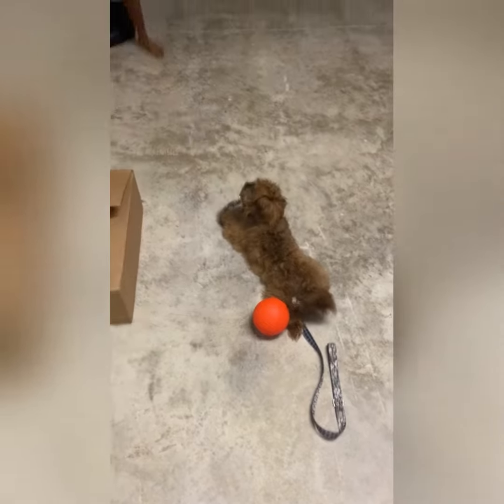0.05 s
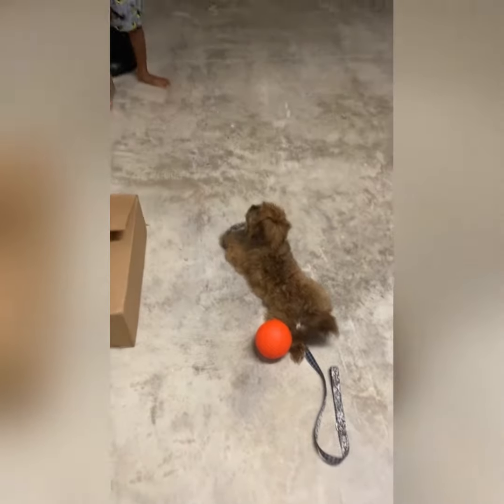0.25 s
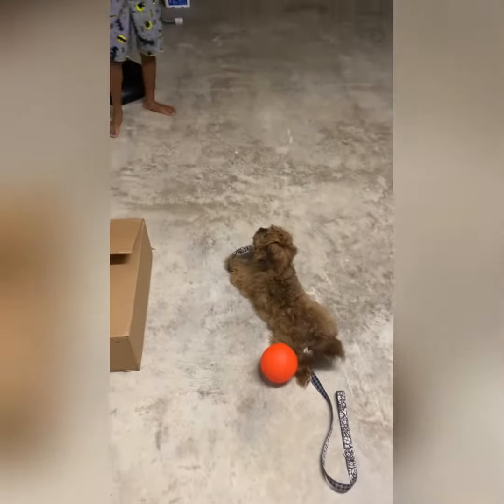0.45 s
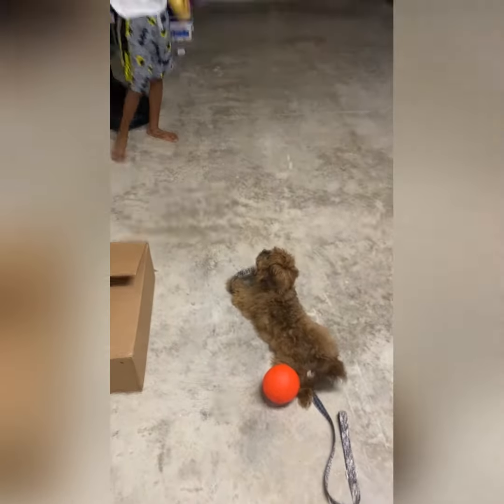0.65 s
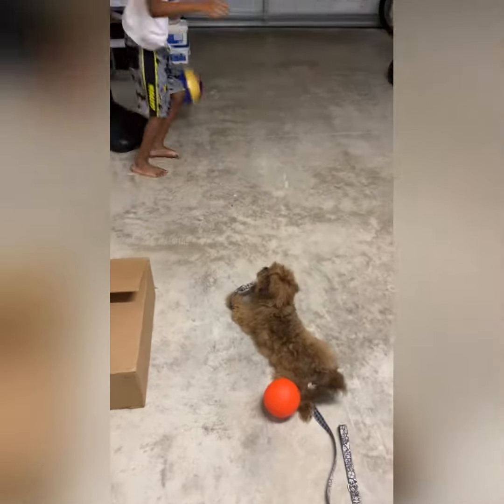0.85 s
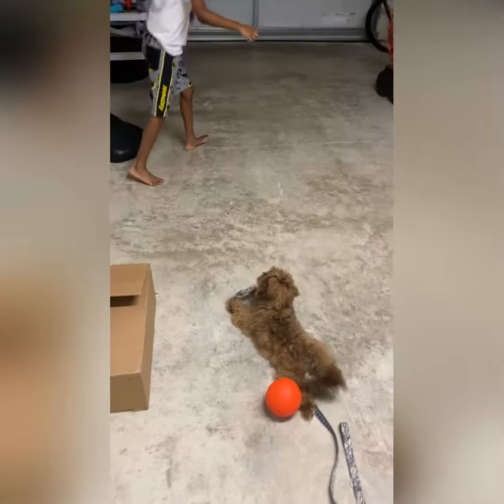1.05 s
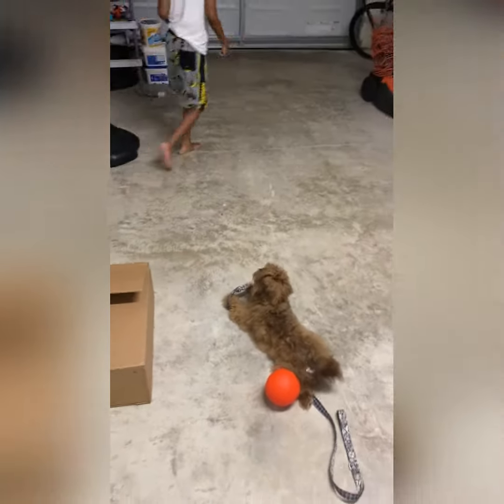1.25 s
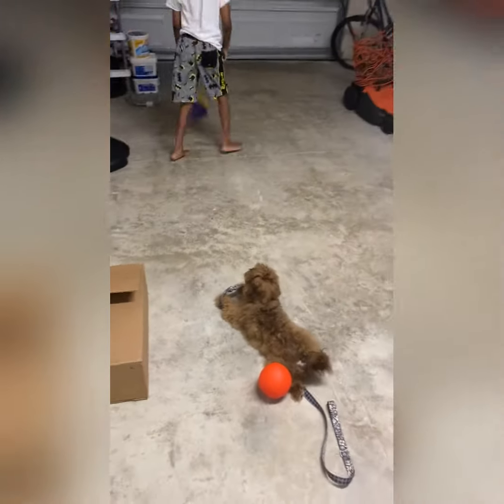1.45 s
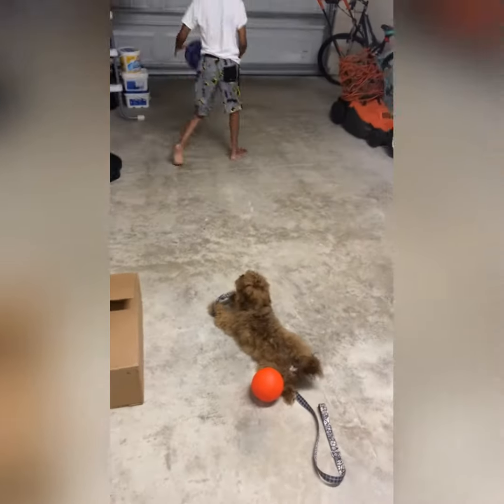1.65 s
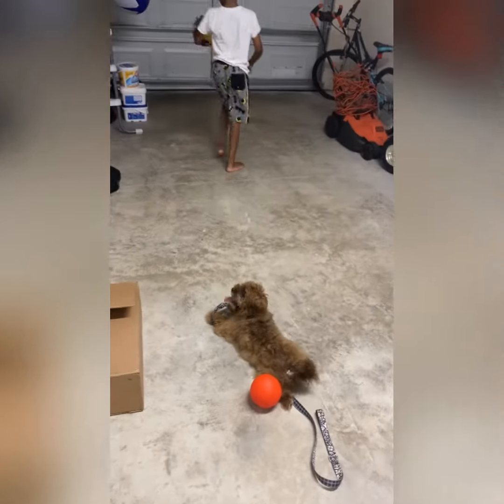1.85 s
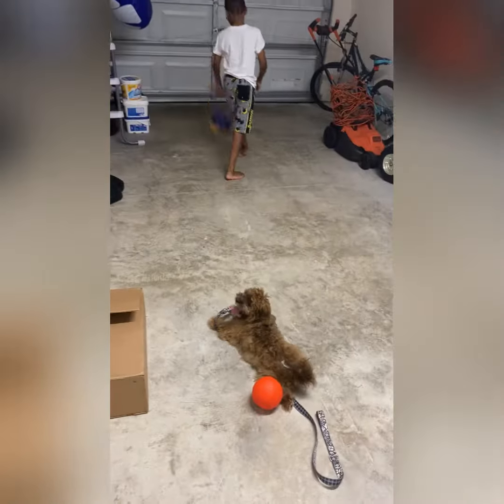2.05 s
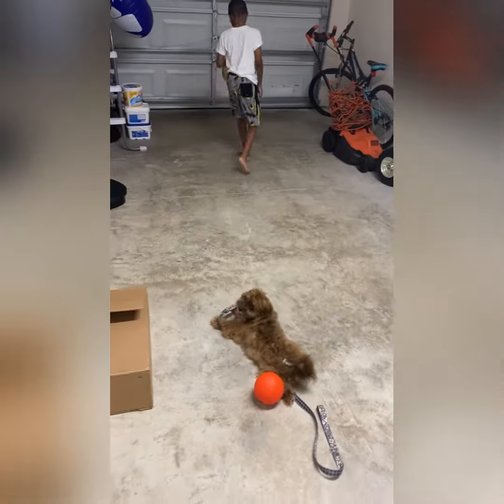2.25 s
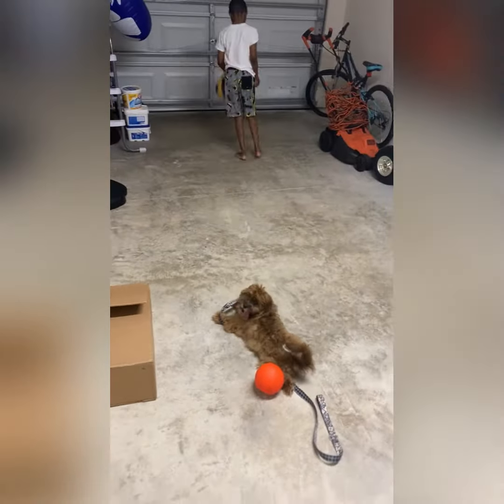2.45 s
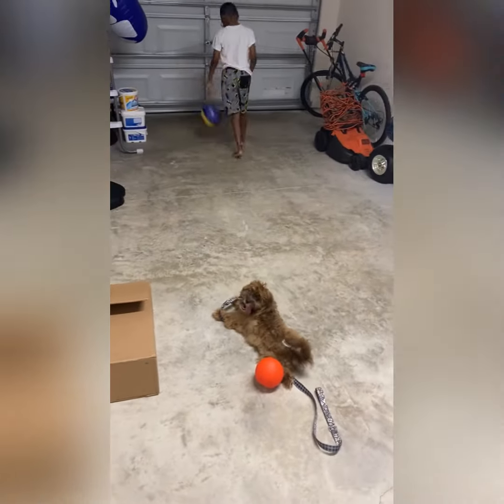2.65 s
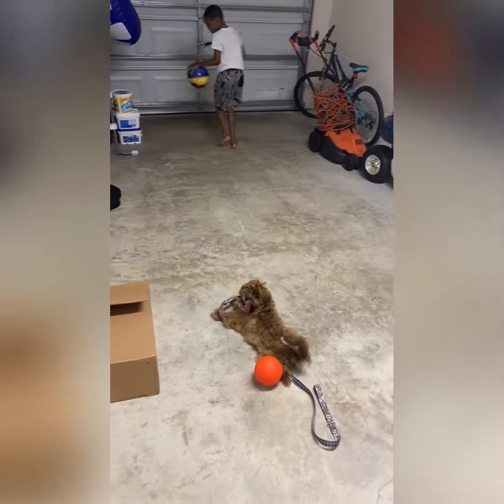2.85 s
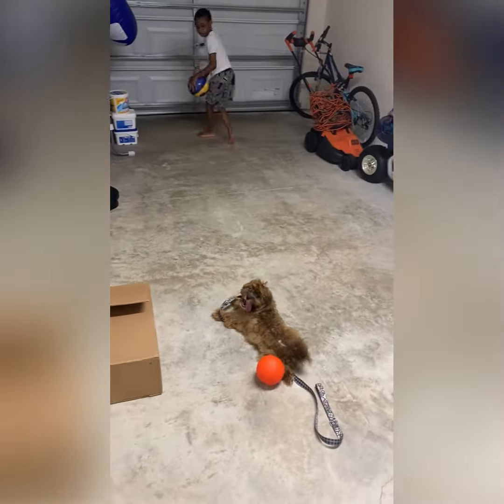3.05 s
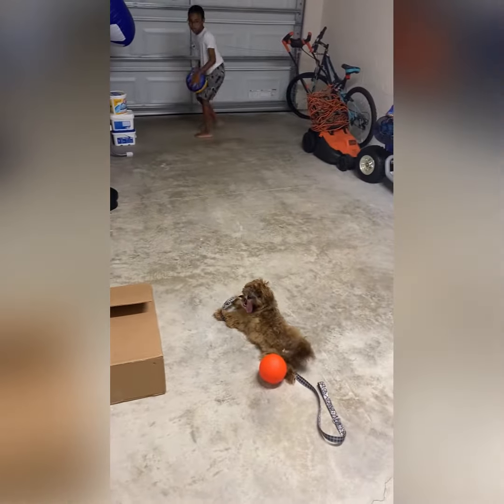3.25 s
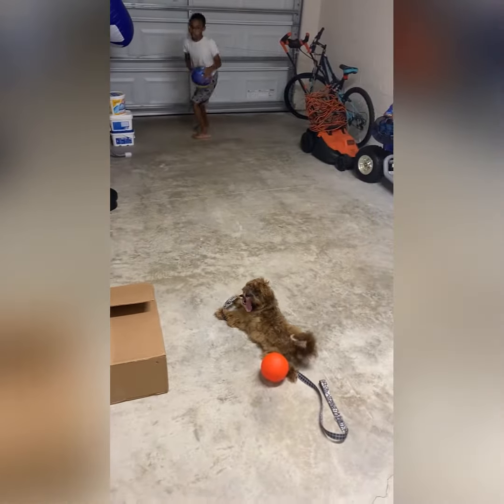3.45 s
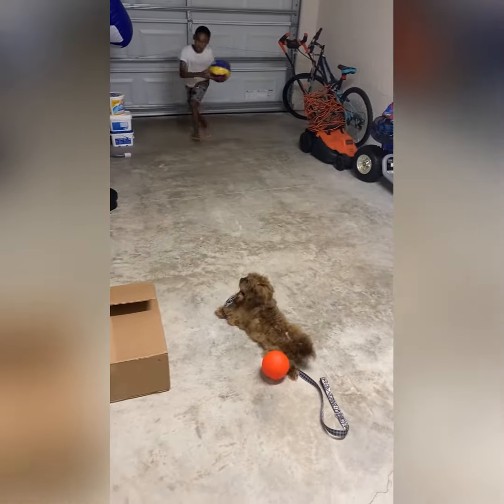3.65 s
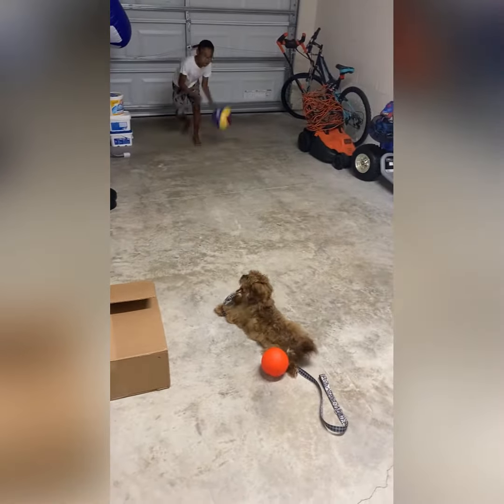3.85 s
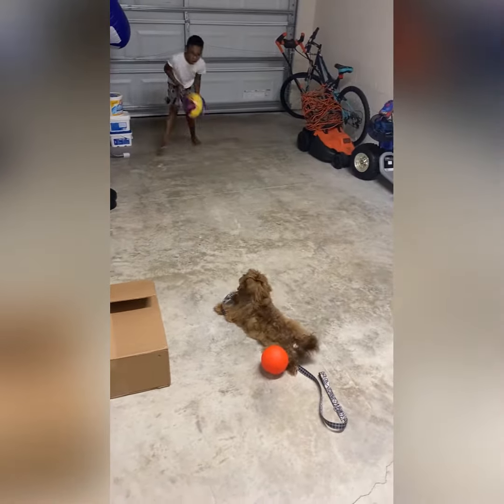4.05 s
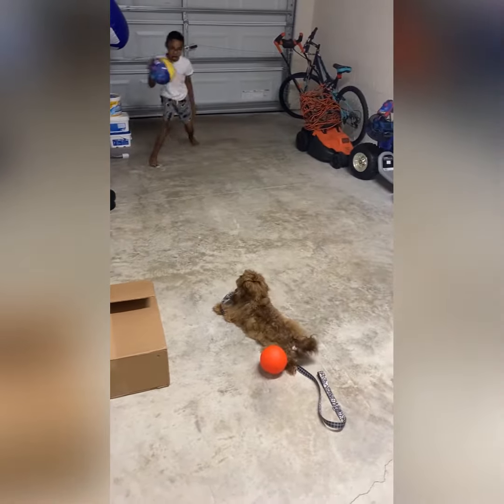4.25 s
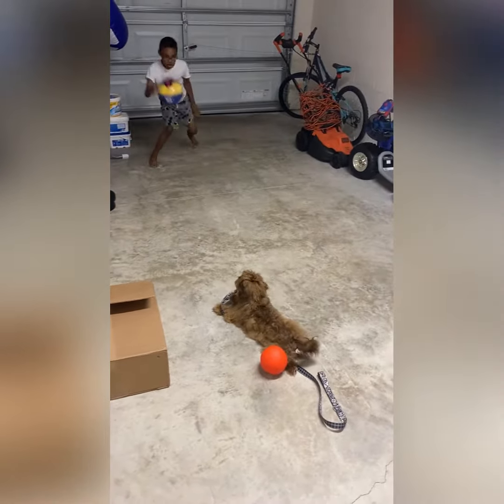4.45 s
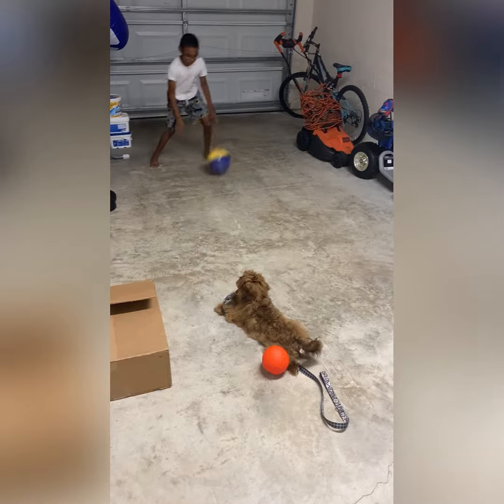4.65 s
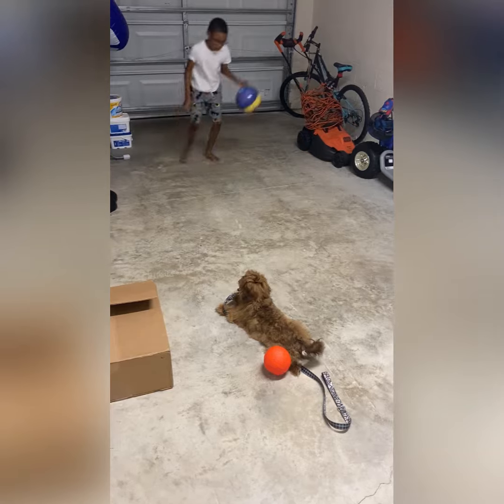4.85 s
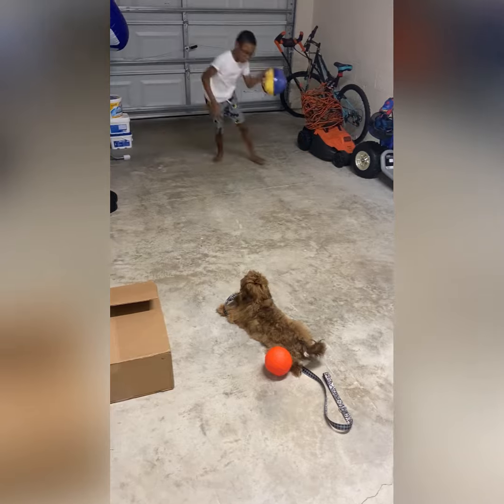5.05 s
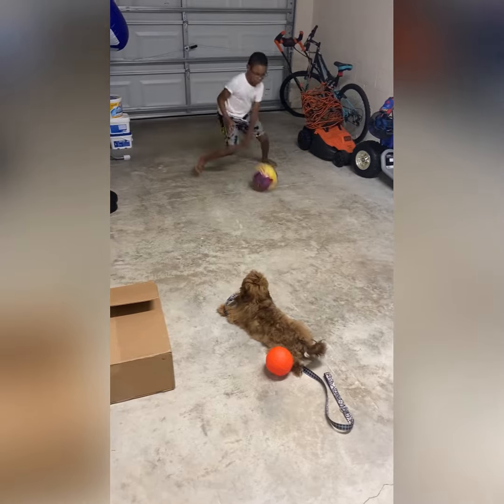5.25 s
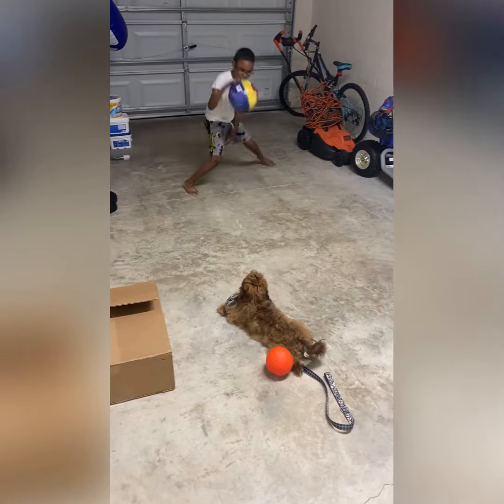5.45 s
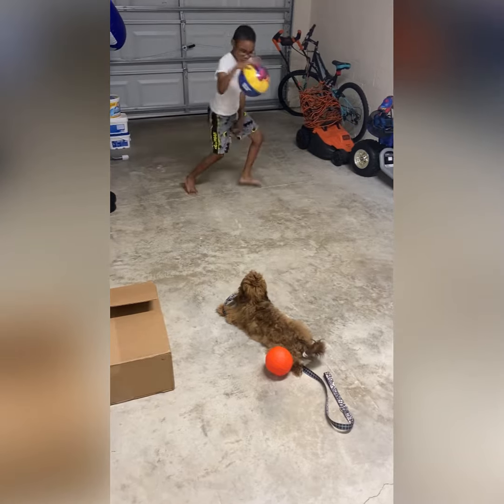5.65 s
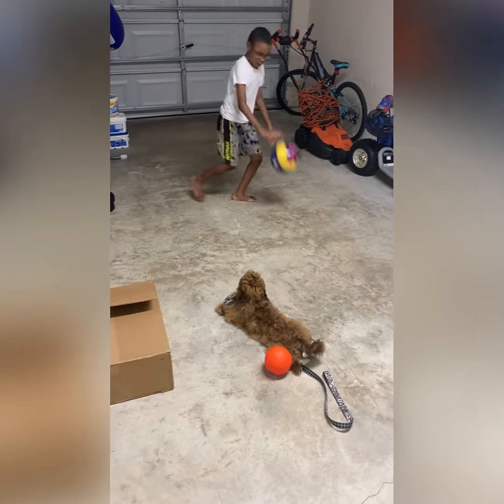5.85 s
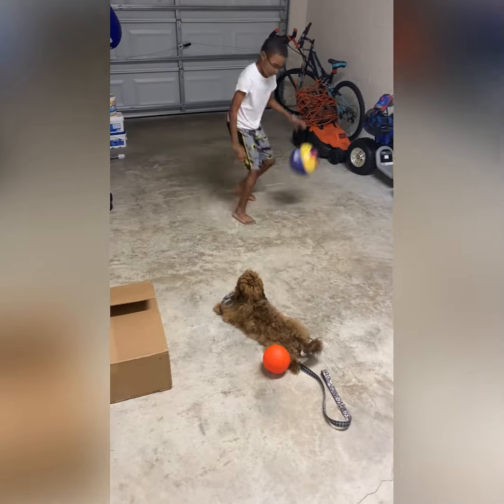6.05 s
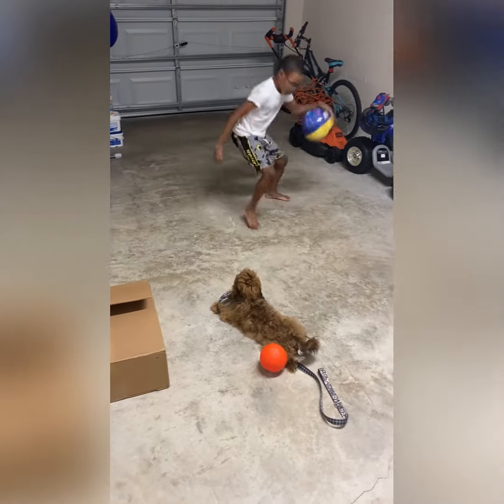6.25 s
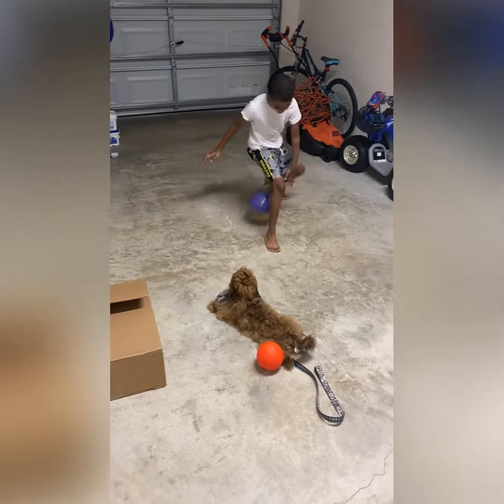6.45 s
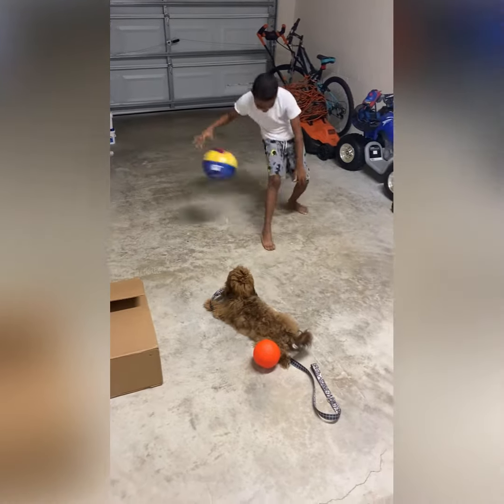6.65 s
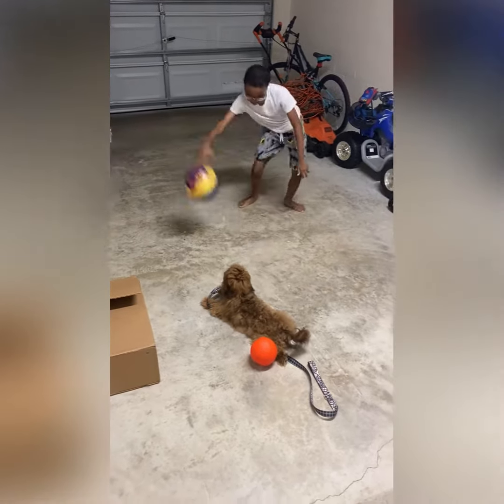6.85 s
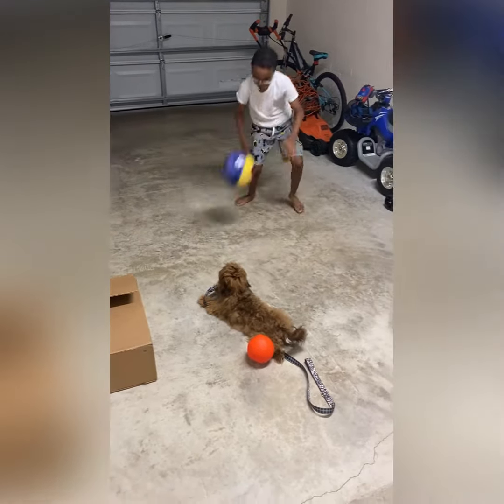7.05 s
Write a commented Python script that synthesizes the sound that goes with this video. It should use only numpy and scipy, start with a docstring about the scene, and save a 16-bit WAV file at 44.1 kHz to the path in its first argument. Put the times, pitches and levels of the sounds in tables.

```python
"""Dribbling a ball in a closed garage

A child dribbles an inflated ball on concrete, walks away towards the door, pauses to smack the held ball, comes back.
Each bounce mixes shaped noise bursts (slap), delayed pulses (thump, knock) and fading sine waves (ping, twang).
Harder bounces are brighter and nearer ones crisper; noise shaped to fade makes the bare room ring, and the door booms.
Pats, a smack, ticks and scuffs come in between, over a faint hiss and a low drone. A phone picks it all up."""
import sys
import numpy as np
from scipy import signal
from scipy.fft import rfft, irfft, next_fast_len
from scipy.io import wavfile
from scipy.ndimage import uniform_filter1d

SR = 44100
rng = np.random.default_rng(int(sys.argv[2]) if len(sys.argv) > 2 else 0)


def dump_mix(stems):
    """Bounce the given channels to the path in sys.argv[1] as a 16-bit WAV at rate SR."""
    frames = np.atleast_2d(stems).T  # one column per channel
    limited = np.clip(frames, -1, 1)  # hard clip at full scale
    pcm = np.round(limited * 32767).astype(np.int16)
    wavfile.write(sys.argv[1], SR, pcm)


N = 313191  # length of the scene in samples
T = np.arange(int(1.3 * SR)) / SR  # clock of one single sound, in seconds

USUAL_DB = 10  # strength of an ordinary bounce
SIZZLE_DB, BRIGHTENING = -6.5, 0.22  # over the slap at usual strength; dB gained per dB of strength above it
# The ball hits the floor. Each row: start in seconds, thump pitch in Hz, strength in dB, hollowness in dB.
BOUNCES = [(0.7857, 161, 11, 0), (1.4605, 182, 11.5, 1), (2.0659, 182, 13, 1), (2.5766, 150, 7, 0),
           (3.9058, 167.5, 11.5, -3.5), (4.631, 158, 10.2, -0.5), (5.236, 152.7, 14.5, -3),
           (5.9365, 142, 10.5, 2), (6.462, 163.7, 7, 4), (6.9233, 147.5, 10.5, -1)]


def bounces():
    """One strength drives every layer of a bounce; the treble grows faster than the rest."""
    out = np.zeros((2, N))
    for s, pitch, db, hollow_db in BOUNCES:
        direct_db = directness(s)
        bright_db = SIZZLE_DB + BRIGHTENING * (db - USUAL_DB)
        bounce = squash(pitch, hollow_db) + slap(direct_db) + amp(bright_db) * sizzle(direct_db)
        add(out, s, amp(db) * bounce)
    return out


# The skin meets the concrete. Each row: frequency in Hz, level in dB per Hz.
SLAP = [(100, -21), (400, -5.5), (650, -2.5), (900, 0.5), (1300, -2), (2100, -2), (3000, -6), (4500, -12),
        (9000, -44)]
# Air ringing inside the ball. Each row: frequency in Hz, strength in dB, time to fade by 60 dB in seconds.
CAVITY = [(877, 6, 0.066), (995, 4, 0.086), (1138, 0, 0.067), (1395, -3, 0.1), (2025, -16, 0.045),
          (3017, 5.5, 0.068), (4280, -10, 0.15), (4479, -5, 0.11)]
# The taut skin's brief twang, before its detuning. Each row: frequency in Hz, strength in dB,
# time to fade by 60 dB in seconds.
TWANG = [(1177, 2, 0.036), (1953, 2, 0.02), (2830, -6, 0.022)]
# Each spot of the skin twangs a little differently: spread of the pitch (natural log), of the strengths (dB).
TWANG_DETUNE, TWANG_SCATTER_DB = 0.07, 3.5


def slap(direct_db):
    """The skin meets the concrete and twangs; the air inside pings."""
    crack = contact(SLAP, life=0.00094, direct_db=direct_db - 1.5, build=0.0051)
    stretch = np.exp(TWANG_DETUNE * rng.normal())
    modes = [(stretch * hz, db, t60) for hz, db, t60 in TWANG]
    twang = amp(direct_db - 3.0) * ringing(modes, attack=0.00046, scatter_db=TWANG_SCATTER_DB)
    ping = garage(ringing(CAVITY, attack=0.0008, scatter_db=3.5))
    return crack + twang + amp(-14.5) * ping


# The push of air as the ball is squashed. Each row: multiple of the thump pitch, level in dB per Hz.
THUMP = [(.2, -33.5), (.42, -6.5), (.6, -5.5), (.74, -1), (1.17, 0), (1.5, -6), (2.2, -31.5), (5, -57.5)]
# The hollow knock of the ball's wall. Each row: multiple of the thump pitch, level in dB per Hz.
KNOCK = [(.55, -22.5), (1.4, -4.5), (1.95, 2), (2.5, -4.5), (3.2, -7.5), (5.5, -26), (18, -64)]
# Standing waves of the garage, excited by every bounce. Each row: frequency in Hz, strength in dB,
# time to fade by 60 dB in seconds.
STANDING = [(81.3, -2.5, 0.5), (119.2, 4, 0.44), (190.2, -3.5, 0.72), (302.5, -8, 0.81), (343, -5.5, 0.87)]
THUMP_DB, KNOCK_DB = 5, -0.64  # over the slap, at zero hollowness
THUMP_YIELD = 0.095  # dB of thump lost per dB of hollowness
THUMP_LAG_S, KNOCK_LAG_S = 0.0029, 0.00395  # the ball takes a moment to squash


def squash(pitch, hollow_db):
    """The squashed ball thumps, its wall knocks, and the room and the door panel boom."""
    push = late(pulse([(ratio * pitch, db) for ratio, db in THUMP]), THUMP_LAG_S)
    thump = amp(-8.5) * push + garage(push, build=0.0092, early_db=-3.5, width_hz=106)
    boom = amp(-16.5) * door() + amp(-10.5) * ringing(STANDING, attack=0.015, scatter_db=0.0)
    wall = late(pulse([(ratio * pitch, db) for ratio, db in KNOCK]), KNOCK_LAG_S)
    knock = amp(-15.5) * wall + garage(wall, early_db=-8, width_hz=320)
    low_gain = amp(THUMP_DB - THUMP_YIELD * hollow_db)
    return low_gain * (thump + boom) + amp(KNOCK_DB + hollow_db) * knock


# Treble of the contact. Each row: frequency in Hz, level in dB per Hz.
SIZZLE = [(1000, -35.5), (3000, -13), (4600, 2), (6500, -5), (8500, -1), (11500, -7.5), (15500, -11.5)]
# Its very top. Each row: frequency in Hz, level in dB per Hz.
CLICK = [(1500, -34), (5000, -15), (9000, 9), (12000, 0), (16000, 3.5)]


def sizzle(direct_db):
    """The treble of the contact; its very top reaches the phone mostly by the straight path."""
    click = amp(direct_db + 1.5) * burst(CLICK, life=0.00052)
    return contact(SIZZLE, life=0.0009, direct_db=direct_db, build=0.0021) + click


# The child's way through the garage. Each row: time in seconds, distance from the phone in metres.
PATH = [(0, 2.8), (0.8, 3.9), (2.6, 4.25), (4.7, 5.2), (5.9, 3.6), (6.9, 2.7)]
DIRECT_AT_1M_DB = 0  # straight path over the room's answer
HIDDEN_S, SHADOW_DB = (1.2, 2.3), -5.5  # while walking away, the child's legs screen the ball


def directness(s):
    """Straight path over the room in dB: it falls with distance and when the ball is screened."""
    hidden = HIDDEN_S[0] < s < HIDDEN_S[1]
    return DIRECT_AT_1M_DB - 20 * np.log10(at(PATH, s)) + SHADOW_DB * hidden


# Soft pats of palms and heels. Each row: start in seconds, thud level in dB.
PATS = [(0.006, -2.5), (1.109, -8), (2.978, 5), (4.28, -1), (5.108, -7), (6.188, -2.5), (6.799, -10.5)]
# Colour of the thud. Each row: frequency in Hz, level in dB per Hz.
THUD = [(30, -10), (70, 2), (130, -3.5), (215, 0), (340, -9.5), (600, -21.5), (2000, -65)]
# Colour of the skin noise. Each row: frequency in Hz, level in dB per Hz.
SKIN = [(200, -1.5), (500, -1), (1100, -2.5), (2200, -9.5), (5000, -20), (15000, -34)]
SKIN_DB = -6.5  # skin noise over the thud
DOOR_M = 5.1  # distance of the big door from the phone, in metres
PAT_BOOM_DB, BOOM_LOSS_DB_PER_M = 0, 11  # door boom over the thud for a pat at the door; loss away from it


def pats():
    """Each pat is a soft thud with skin noise; the nearer to the door, the more the panel booms."""
    out = np.zeros((2, N))
    for s, db in PATS:
        thud = contact(THUD, life=0.0037, direct_db=-10.5, build=0.005)
        skin = contact(SKIN, life=0.0051, direct_db=-17.5, build=0.012)
        boom_db = PAT_BOOM_DB - BOOM_LOSS_DB_PER_M * (DOOR_M - at(PATH, s))
        add(out, s, amp(db) * (thud + amp(SKIN_DB) * skin + amp(boom_db) * door()))
    return out


def door():
    """The low boom of the big door panel after a blow: one slowly fading tone."""
    return ringing([(54.57, 0, 1.14)], attack=0.008, scatter_db=1)


# A palm smacks the held ball. Each row: start in seconds, level in dB.
SMACKS = [(3.4124, -1.5)]
# Colour of the smack. Each row: frequency in Hz, level in dB per Hz.
PALM = [(150, -19), (450, -5), (850, 6), (1200, 4), (1800, -3.5), (3200, -1.5), (6500, -9), (10000, -18.5),
        (15000, -27)]
FINGERS_LEAD_S, FINGERS_DB = 0.00235, -9  # the fingers land just before the palm; level over the palm


def smacks():
    """A palm smacks the held ball: a short contact, with a weaker copy just ahead for the fingers."""
    out = np.zeros((2, N))
    for s, db in SMACKS:
        smack = amp(db) * contact(PALM, life=0.0016, direct_db=-10, build=0.0054)
        add(out, s - FINGERS_LEAD_S, amp(FINGERS_DB) * smack)
        add(out, s, smack)
    return out


# Small dry ticks. Each row: start in seconds, level in dB.
TICKS = [(1.0516, -14), (6.1914, -13.5)]
# Colour of a tick. Each row: frequency in Hz, level in dB per Hz.
TICK = [(1000, -6), (5000, 3), (12000, -3), (16000, -11)]


def ticks():
    """Very short contacts, mostly treble."""
    out = np.zeros((2, N))
    for s, db in TICKS:
        add(out, s, amp(db) * contact(TICK, life=0.00045, direct_db=-4.5, build=.004))
    return out


# Skin brushing over ball and floor. Each row: start in seconds, level in dB.
SCUFFS = [(0.732, -9.5), (1.411, -19), (2.46, -20.5), (3.33, -19.5), (3.871, -20), (5.089, -14),
          (5.63, -20), (6.31, -8.5), (6.565, -11.5), (6.674, -15), (6.835, -8)]
# Colour of the brushing. Each row: frequency in Hz, level in dB per Hz.
BRUSH = [(200, 1), (1000, -3.5), (2500, 3), (5500, -6.5), (9000, -8), (15000, -11.5)]
SCUFF_S = 0.04  # length of one stroke


def scuffs():
    """Rubbing makes noise that swells and fades over one stroke, heard mostly through the room."""
    out = np.zeros((2, N))
    for s, db in SCUFFS:
        swell = np.sin(np.pi * np.clip(T / SCUFF_S, 0, 1))
        stroke = swell * rng.standard_normal(len(T))
        brush = amp(db) * blow(coloured(stroke, BRUSH))
        add(out, s, amp(-12.5) * brush + garage(brush))
    return out


def contact(spectrum, life, direct_db, build, ripple=0.35):
    """Its crackle arrives directly; the room gathers it from all directions, which smooths its colour."""
    crackle = burst(spectrum, life)
    return amp(direct_db) * crackle + garage(blow(pulse(spectrum) + ripple * crackle), build)


def burst(spectrum, life):
    """A brief, spiky crackle that swells and dies."""
    crackle = rng.laplace(size=len(T)) * T / life * np.exp(-T / life)
    return blow(coloured(evened(crackle, width_hz=620), spectrum))


def pulse(spectrum):
    """One clean push of the given colour."""
    return blow(coloured(signal.unit_impulse(len(T)), spectrum))


def ringing(modes, attack, scatter_db):
    """Fading sine tones, their strengths scattered at random by scatter_db."""
    ring = np.zeros(len(T))
    for hz, db, t60 in modes:
        fade = amp(db + scatter_db * rng.normal() - 60 * T / t60)
        ring += fade * np.sin(2 * np.pi * hz * T)
    return blow(ring * (1 - np.exp(-(T / attack) ** 2)))


# How long the garage rings. Each row: frequency in Hz, time to fade by 60 dB in seconds.
RING = [(60, 0.82), (150, 0.33), (300, 0.75), (600, 0.87), (2500, 0.9), (5000, 0.9), (8000, 0.68),
        (11000, 0.56), (16000, 0.35)]


def garage(x, build=0.0048, early_db=-7, width_hz=900):
    """The room's answer: early wall reflections and a dense fading tail, drawn anew for each sound."""
    hz, t, z = signal.stft(diffuse(len(T)), SR, nperseg=256)
    fade = amp(-60 * t / along(RING, hz)[:, None])  # each pitch fades at its own pace
    tail = signal.istft(z * fade, SR, nperseg=256)[1][:, :len(T)]
    tail = blow(tail * (1 - np.exp(-T / build)))
    answer = tail * np.sqrt(2) + amp(early_db) * walls(spread=.045)
    answer = evened(answer, width_hz)
    return signal.fftconvolve(x[None], answer, axes=1)[:, :len(T)]


def walls(spread, count=14):
    """Single early reflections, each reaching the two ports at slightly different moments."""
    taps = np.zeros((2, len(T)))
    when = .004 + spread * rng.random(count) ** 1.3  # seconds
    skew = rng.uniform(-0.00044, .0004, count)  # seconds between the ports
    strength = rng.normal(size=count) * np.exp(-when / 0.024)
    for port, side in enumerate((-.5, .5)):
        taps[port, np.round((when + side * skew) * SR).astype(int)] = strength
    return taps / np.linalg.norm(strength)


# How alike the two ports hear sound from all sides. Each row: frequency in Hz, likeness from 0 to 1.
ALIKE = [(60, 0.96), (170, 0.95), (330, 0.49), (550, 0), (1500, 0), (5000, 0.22)]


def diffuse(n):
    """Noise from all sides: alike at both ports in the bass, much less alike higher up."""
    def shares(hz):
        turn = np.arccos(np.clip(along(ALIKE, hz), -1, 1)) / 2
        return np.array([np.cos(turn), np.sin(turn)])
    mid, side = filtered(rng.standard_normal((2, n)), shares)
    return np.array([mid + side, mid - side])


# Colour of the still room. Each row: frequency in Hz, level in dB per Hz.
AIR = [(20, -25), (45, -13), (108, -10.5), (394, -9.5), (1330, -15), (2840, -17), (7700, -30.5),
       (11000, -33), (16000, -40)]
# Level of the room's faint hiss. Each row: time in seconds, level in dB.
AIR_LEVEL = [(0.3, -61), (0.5, -58), (1.3, -56)]
# Colour of the low drone. Each row: frequency in Hz, level in dB per Hz.
DRONE = [(20, -19), (32, -13), (45, -7), (55, 5), (64, -13), (85, -11.5), (130, -18.5), (220, -20.5),
         (500, -48), (2000, -90)]
# Level of the low drone. Each row: time in seconds, level in dB.
DRONE_LEVEL = [(0.3, -54), (1.2, -54.5), (4.5, -46.5)]


def room_tone():
    """Faint air noise and a low drone at the door's resonance that grows as play gets under way."""
    now = np.arange(N) / SR
    air = unit(filtered(diffuse(N), lambda hz: amp(along(AIR, hz))))
    drone = unit(filtered(diffuse(N), lambda hz: amp(along(DRONE, hz))))
    return amp(at(AIR_LEVEL, now)) * air + amp(at(DRONE_LEVEL, now)) * drone


def amp(db):
    """Decibels to gain."""
    return 10 ** (np.asarray(db) / 20)


def unit(x):
    """Scaled to rms 1."""
    return x / np.sqrt(np.mean(x ** 2) + 1e-20)


def blow(x):
    """Scaled to energy 1."""
    return x / np.linalg.norm(x)


def at(curve, s):
    """The value of a (seconds, value) curve at time s."""
    return np.interp(s, *np.transpose(curve))


def along(points, hz):
    """The value of a (Hz, value) curve, read on a log frequency axis."""
    f, v = np.transpose(points)
    return np.interp(np.log(hz + 1), np.log(f + 1), v)


def late(x, seconds):
    """x delayed."""
    return np.interp(T - seconds, T, x, left=0)


def add(track, s, sound):
    """Mix a sound in at time s."""
    start = max(round(s * SR), 0)
    track[:, start:start + sound.shape[-1]] += sound[..., :N - start]


def filtered(x, response):
    """x times a response of frequency."""
    n = x.shape[-1]
    m = next_fast_len(n + 8192)
    return irfft(rfft(x, m) * response(np.fft.rfftfreq(m, 1 / SR)), m)[..., :n]


def coloured(x, spectrum, size=4096):
    """x through a filter with the given spectrum that never sounds ahead of its input."""
    cepstrum = irfft(np.log(amp(along(spectrum, np.fft.rfftfreq(size, 1 / SR)))))
    # Folding the cepstrum's second half onto its first makes the filter minimum-phase.
    cepstrum[1:size // 2] *= 2
    cepstrum[size // 2 + 1:] = 0
    return signal.fftconvolve(x, irfft(np.exp(rfft(cepstrum))))[:len(x)]


def evened(x, width_hz):
    """x with its broad spectral humps levelled and its fine ripple kept."""
    m = next_fast_len(x.shape[-1] + 8192)
    z = rfft(x, m)
    power = np.mean(abs(np.atleast_2d(z)) ** 2, axis=0)
    smooth = uniform_filter1d(power, max(int(width_hz * m / SR), 1))
    return irfft(z / np.sqrt(abs(smooth) + 1e-12), m)[..., :x.shape[-1]]


def scene():
    """Everything in the garage."""
    return bounces() + pats() + smacks() + ticks() + scuffs() + room_tone()


# Phase between the channels, before it is bent. Each row: frequency in Hz, angle in radians by which left leads.
TWIST = [(6300, -.8), (7000, 0), (9100, 3.14), (11200, 6.28), (13250, 9.42), (15300, 12.57)]


def twist(hz):
    """Left and right turn apart in phase, lingering in step and in opposition."""
    angle = along(TWIST, hz)
    angle = angle - .36 * np.sin(2 * angle)
    return np.exp(np.array([[.5j], [-.5j]]) * angle)


# Balance of the two channels. Each row: frequency in Hz, left over right in dB.
LEAN = [(60, 0.5), (250, -3), (600, 1.5), (1500, -2), (3500, 2), (5300, 3), (7000, 0.5)]
TOP_HZ = 15900  # upper end of the phone's band


def record(dry):
    """The phone feeds both channels' treble from one port, turned in phase, and cuts both ends of the band."""
    def shared(hz):
        return 1 / (1 + (6300 / (hz + 1)) ** 24)  # share of the power taken from the one port
    own = filtered(dry, lambda hz: np.sqrt(1 - shared(hz)))
    common = filtered(dry[0], lambda hz: np.sqrt(shared(hz)) * twist(hz))
    pair = filtered(own + common, lambda hz: amp(np.array([[.5], [-.5]]) * along(LEAN, hz)))
    pair = signal.sosfilt(signal.butter(4, 45, "highpass", fs=SR, output="sos"), pair)
    return filtered(pair, lambda hz: 1 / np.sqrt(1 + (hz / TOP_HZ) ** 160))


dry = scene()
out = record(dry)
dump_mix(out)
```